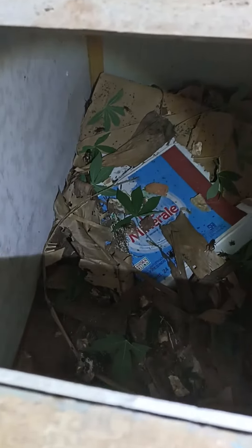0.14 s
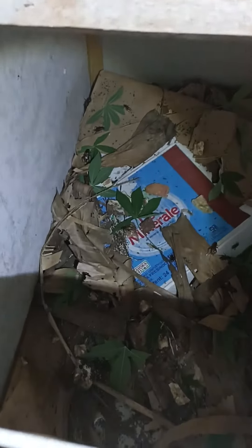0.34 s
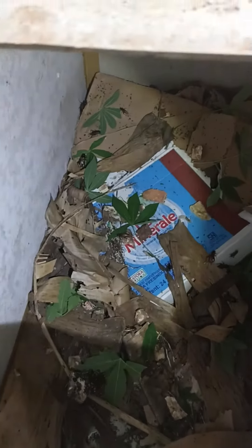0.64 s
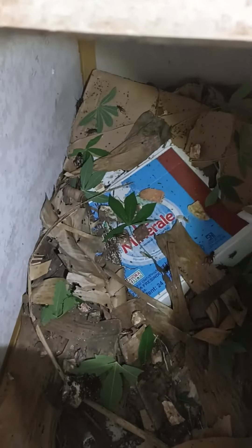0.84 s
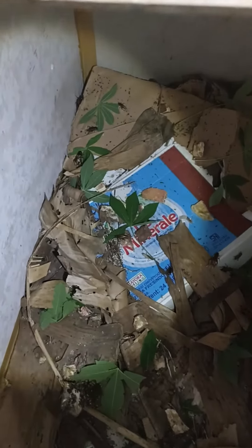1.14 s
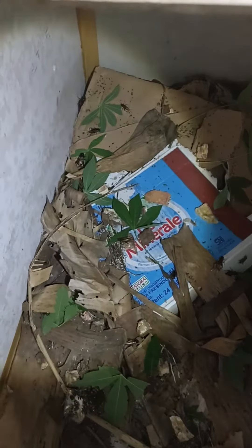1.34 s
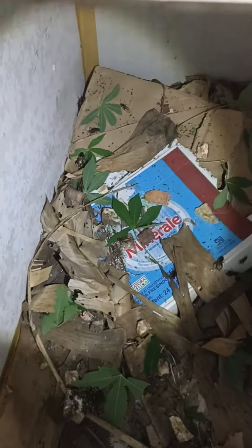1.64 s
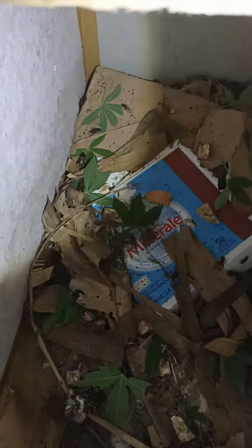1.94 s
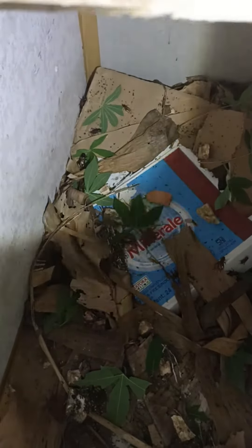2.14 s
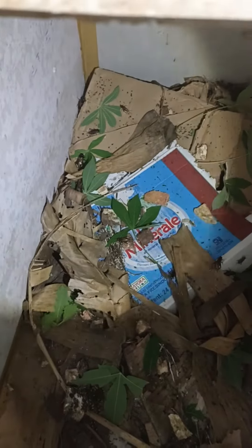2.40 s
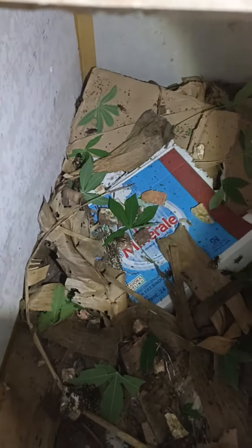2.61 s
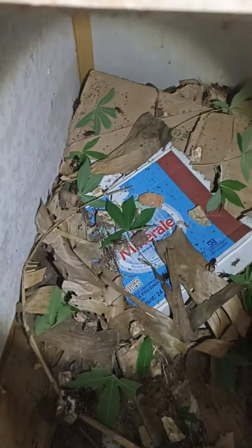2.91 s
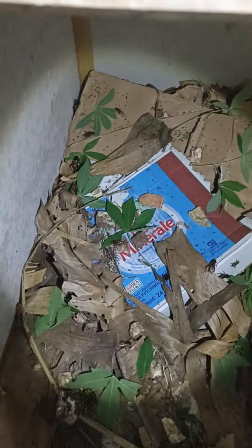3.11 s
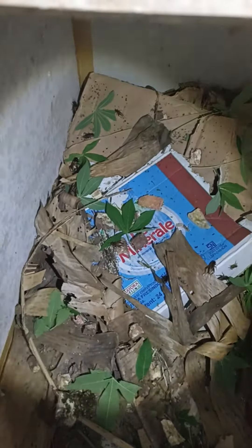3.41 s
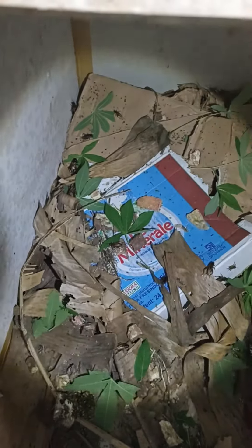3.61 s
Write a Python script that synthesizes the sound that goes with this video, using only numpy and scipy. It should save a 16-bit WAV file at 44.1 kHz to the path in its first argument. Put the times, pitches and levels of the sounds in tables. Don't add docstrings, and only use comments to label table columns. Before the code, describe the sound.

A close cricket sings quick, regular shrill chirps that strengthen, with thin ticking and raspy scrapes

```python
import sys
import numpy as np
from scipy import signal
from scipy.fft import rfft, irfft, next_fast_len
from scipy.io import wavfile
from scipy.ndimage import uniform_filter1d, map_coordinates

SR = 44100
rng = np.random.default_rng(int(sys.argv[2]) if len(sys.argv) > 2 else 0)


def store_pcm(level_fs):
    pcm = np.round(np.clip(level_fs, -1, 1) * 32767).astype(np.int16)
    wavfile.write(sys.argv[1], SR, np.atleast_2d(pcm).T)


def nominal_scale(level):
    x = np.asarray(level, float) / 20
    return 10 ** x


N = 165375

# frequency in Hz, density in dB per Hz.
HUM = [(18, -42), (30, -2), (178, 0.5), (322, -8.5), (702, -13), (810, -16), (1410, -18.5), (1880, -21),
       (4000, -23.5), (5200, -33), (8800, -120)]
# frequency in Hz, likeness from 0 to 1.
ALIKE = [(60, 1), (150, 0.76), (300, 0.42), (600, 0.4), (1200, 0)]
# frequency in Hz, density in dB per Hz.
HISS = [(3500, -37), (4500, 3), (6000, 14), (7000, 9), (9000, -5.5), (12000, 8), (15900, 0)]
# centre in seconds, length in seconds, level in dB.
RUSTLES = [
    (0.25, 0.18, -60.5),
    (0.796, 0.081, -63.5),
    (.95, 0.34, -64),
]
# frequency in Hz, density in dB per Hz.
RUSTLE_COLOUR = [(800, -5.5), (2500, 0), (4000, -12)]
# time in seconds, sixth order in Hz, level in dB.
ENGINE = [
    (0.8, 201.3, -72.5),
    (2.401, 194, -59.5),
    (2.52, 193.3, -56),
    (3.7, 190.2, -55),
]
# order (multiple of shaft speed), level in dB.
ENGINE_ORDERS = [(3.5, -6.5), (5, -2), (6, 0), (7, -58)]
# centre in seconds, length in seconds, frequency in Hz, level in dB.
FAR_TONES = [
    (1.75, .45, 670, -68),
    (3.25, .16, 1250, -70),
    (3.36, .12, 1280, -64.5),
    (3.35, .1, 1150, -68),
    (3.33, .1, 1430, -72),
    (3.12, .08, 1510, -70),
    (3.5, .12, 1050, -72),
]
# start in seconds, level in dB.
TICKS = [(0.0328, -24.5), (0.215, -29), (0.4, -21), (0.5815, -22.5), (0.7622, -23.5), (0.9368, -27),
         (1.119, -22), (1.2884, -19), (1.462, -31), (1.6333, -17.5), (1.807, -22.5), (1.983, -20),
         (2.159, -19), (2.3356, -19), (2.506, -21), (2.681, -29), (2.8526, -19.5), (3.0187, -18),
         (3.1996, -19.5), (3.3857, -21.5), (3.56, -20), (3.739, -20.5)]
# frequency in Hz, gain in dB.
TICK_SPRAY = [(4500, -14), (6000, -7), (11000, -20.5), (14000, 11), (16200, -8)]
# time in seconds, peak in dB.
FAR_STROKES = [(0.07, -54), (0.255, -54.5), (0.548, -55), (0.803, -52.5), (0.971, -51.5), (1.162, -50),
               (1.324, -49.5), (1.499, -50), (1.5897, -53), (2.0216, -52), (2.7245, -46.5), (2.8926, -51.5)]
# time in seconds, level in dB.
RASP_EARLY = [(0.1137, -56), (0.1463, -52), (0.2529, -54), (0.2883, -53.5), (0.4276, -49.5), (0.5601, -53),
              (0.5945, -42.5), (0.6921, -57), (0.7196, -52), (0.79, -56), (0.8478, -51), (0.8592, -53),
              (0.9069, -51), (0.965, -54), (1.0209, -48.5), (1.0437, -46.5), (1.0721, -49), (1.2046, -40.5),
              (1.2312, -46.5), (1.403, -63), (1.433, -55), (1.461, -42.5), (1.6075, -50), (1.628, -54),
              (1.6522, -43.5), (1.8417, -41.5), (1.8612, -47), (1.8898, -41)]
# time in seconds, level in dB.
RASP_LATE = [(1.923, -47), (2.1236, -47), (2.151, -39.5), (2.1715, -46), (2.3361, -41.5), (2.3639, -41),
             (2.3859, -44), (2.5353, -50), (2.5622, -39.5), (2.5804, -46), (2.7422, -43), (2.7688, -43.5),
             (2.792, -49), (2.9817, -44), (3.0182, -40), (3.1484, -55), (3.1658, -41.5), (3.2256, -38),
             (3.2585, -44), (3.3498, -43), (3.3766, -50), (3.4013, -43), (3.4741, -56), (3.5091, -44),
             (3.5368, -43), (3.5695, -39), (3.5898, -43), (3.7284, -44.5)]
# frequency in Hz, gain in dB.
RASP_HIGH = [
    [(6200, -3), (7500, -7.5), (8000, -5.5), (8600, -7.5), (10700, -15), (12200, -0.5), (15000, 0.5),
     (16200, -13)],
    [(6200, -3), (7500, -4), (8000, 7), (8500, -12), (9600, -3.5), (10800, -29), (12200, -18), (16000, -18)],
]
# frequency in Hz, gain in dB.
RASP_LOW = [(4300, -12.5), (5200, -1.5), (6600, -11)]
# left, then right, in dB.
RASP_WET_DB = [-1, -2]
# time in seconds, level in dB, pitch in Hz, turn to the left in dB.
SONG = [(0.4303, -45.5, 5920, 4.5), (0.5954, -29, 5814, -1), (0.8974, -43.5, 5990, 1),
        (1.0442, -28.5, 5894, 3.5), (1.0657, -38, 5940, -2), (1.209, -46.4, 6080, -1),
        (1.2304, -30.5, 5900, 4.5), (1.444, -25.5, 5960, 2.5), (1.4701, -23.5, 5865, 3),
        (1.63, -29.5, 5920, 4.5), (1.6564, -22.5, 5920, 0.7), (1.8393, -45, 5820, 5),
        (1.8672, -29, 5790, 4), (1.8948, -21, 5900, 5.5), (1.9209, -22.5, 5840, 3.3),
        (2.154, -30.5, 5830, 3), (2.179, -25, 5863, 2), (2.3635, -26, 5910, 4), (2.3913, -19, 5906, 3.2),
        (2.56, -29, 5920, 0.5), (2.5865, -20, 5880, -1), (2.7432, -41, 5880, 5), (2.7669, -24.5, 5860.0, 1),
        (2.7934, -19, 5864, 0.5), (2.9836, -40.5, 5750, 1), (3.0047, -25, 5870.0, 0.5),
        (3.0315, -21, 5910, 1.3), (3.1643, -31, 5820, 3.5), (3.214, -40.8, 5980.0, 8),
        (3.2374, -29, 5924, 4), (3.2556, -29, 6010, 3), (3.3503, -33.5, 5810, -2.5),
        (3.374, -20.5, 5846, -1), (3.403, -17, 5867, 0.5), (3.5075, -29, 6090.0, 8), (3.5368, -27, 6040, 6),
        (3.57, -23, 5850, -1.5), (3.5986, -14, 5890, -2), (3.6262, -12, 5956, -0.5),
        (3.7277, -22.5, 5960, 2.5)]
# time in seconds, stroke length factor.
STROKE_DRIFT = [
    (2.4, 1),
    (3.1, .9),
    (3.6, .72),
]
# left, then right, in dB.
SONG_WET_DB = [-2, -6]
# time in seconds, peak in dB, pitch in Hz.
LITTER = [
    (2.454, -43, 3050),
    (2.4792, -38.5, 2930),
    (2.4989, -28, 3080),
    (2.504, -30.5, 3174),
    (2.514, -36, 2690),
]

BOX_T60, SHED_T60, SHED_DB = 0.077, 0.39, -23


def unit(x):
    return x / np.sqrt(np.mean(x ** 2) + 1e-20)


def along(points, hz):
    f, v = np.transpose(points)
    return np.interp(np.log(hz + 1), np.log(f + 1), v)


def filtered(x, response):
    m = next_fast_len(x.shape[-1] + 4096)
    spectrum = rfft(x, m) * response(np.fft.rfftfreq(m, 1 / SR))
    return irfft(spectrum, m)[..., :x.shape[-1]]


def closed(points):
    return lambda hz: nominal_scale(along(points, hz)) * (hz > points[0][0]) * (hz < points[-1][0])


def wobble(rate):
    knots = rng.standard_normal(int(N * rate / SR) + 4)
    return map_coordinates(knots, [np.arange(N) * rate / SR])


def patchy(depth_db):
    z = signal.stft(rng.standard_normal((2, N)), nperseg=256)[2]
    field = uniform_filter1d(rng.standard_normal(z.shape[1:]), size=6, axis=0)
    field = uniform_filter1d(field, size=10, axis=1)
    return signal.istft(z * nominal_scale(depth_db * unit(field)), nperseg=256)[1][:, :N]


def grain(shape, size):
    noise = rng.standard_normal(shape)
    return unit(signal.fftconvolve(noise, np.hanning(size)[None], "same", axes=1))


def boxed(times, sounds, wet_db, t60):
    t = np.arange(SR // 4) / SR
    fade = nominal_scale(-60 * t / t60) + nominal_scale(SHED_DB - 60 * t / SHED_T60)
    fade = fade * (1 - np.exp(-t / 0.0024))
    tails = rng.standard_normal((len(times), 2, len(t))) * fade / np.linalg.norm(fade)
    tails = tails * nominal_scale(wet_db)[:, None]
    tails[..., 0] += 1
    wet = signal.fftconvolve(sounds, tails, axes=2)
    out = np.zeros((2, N + SR))
    for s, w in zip(times, wet):
        start = round(s * SR)
        out[:, start:start + w.shape[1]] += w
    return out[:, :N]


def glide(count, top_hz, end_hz, length, rise, fall, scatter):
    t = np.arange(SR // 40) / SR
    hz = end_hz + (top_hz - end_hz) * np.clip(1 - t / length, 0, 1) ** 1.46
    hz = hz * (1 + scatter * rng.standard_normal((count, 1)))
    shape = np.sin(np.pi / 2 * np.clip(t / rise, 0, 1)) * np.clip((length - t) / fall, 0, 1)
    return 2 * np.pi * np.cumsum(hz, 1) / SR, shape


def shed():
    t = np.arange(N) / SR
    turn = lambda hz: np.arccos(np.clip(along(ALIKE, hz), -1, 1)) / 2
    spread = lambda hz: closed(HUM)(hz) * [np.cos(turn(hz)), np.sin(turn(hz))]
    mid, side = filtered(patchy(depth_db=1.48), spread)
    hum = unit(np.array([mid + side, mid - side])) * nominal_scale([[-.6], [.6]])
    hum_db = -52 - 1.33 * (t / t[-1] - 0.53)
    tilt = lambda hz: nominal_scale([0 * hz, -7 * np.log2((hz + 1) / 6000)])
    hiss = unit(filtered(patchy(depth_db=2.2), lambda hz: closed(HISS)(hz) * tilt(hz)))
    flutter_db = 2.2 * wobble(70) + 1.8 * wobble(28)
    hiss_db = -63 - 2 * t / t[-1] + flutter_db
    swells = sum(nominal_scale(db) * np.exp(-(2 * (t - s) / length) ** 2) for s, length, db in RUSTLES)
    rustle = swells * nominal_scale(2 * wobble(41.2)) * unit(filtered(patchy(depth_db=1.0), closed(RUSTLE_COLOUR)))
    return nominal_scale(hum_db) * hum + nominal_scale(hiss_db) * hiss + rustle


def engine():
    t = np.arange(N) / SR
    s, hz, db = np.transpose(ENGINE)
    turn = 2 * np.pi * np.cumsum(np.interp(t, s, hz) / 6) / SR
    drone = sum(nominal_scale(level + 1.07 * wobble(9)) * np.sin(k * turn + 0.32 * wobble(10))
                for k, level in ENGINE_ORDERS)
    far = np.zeros(N)
    for centre, length, f, level in FAR_TONES:
        swell = nominal_scale(level + 3 * wobble(14)) * np.exp(-(2 * (t - centre) / length) ** 4)
        far += swell * np.sin(2 * np.pi * f * t + .7 * wobble(25))
    return nominal_scale(np.interp(t, s, db) + 3.5) * drone * nominal_scale([[-.7], [.7]]) + far


def ticks():
    s, db = np.transpose(TICKS)
    phase, shape = glide(len(s), top_hz=16000, end_hz=14750, length=.007, rise=.0042, fall=.0016, scatter=.008)
    spray = filtered(shape * rng.standard_normal(phase.shape), closed(TICK_SPRAY))
    rough = 1 + .35 * grain(phase.shape, size=40)
    chirp = rough * shape ** 2 * np.sin(phase)
    pair = chirp[:, None] * nominal_scale([[4.5], [-50]]) + spray[:, None] * nominal_scale([[-6], [-17.5]])
    return boxed(s, nominal_scale(db - 5.5)[:, None, None] * pair, wet_db=[-4, 7], t60=.075)


def far_cricket():
    s, db = np.transpose(FAR_STROKES)
    phase, shape = glide(len(s), top_hz=5450, end_hz=5100, length=.013, rise=.0022, fall=.0017, scatter=.02)
    stroke = nominal_scale(db)[:, None] * shape * np.sin(phase + 1.9 * grain(phase.shape, size=70))
    return boxed(s - .003, stroke[:, None] * nominal_scale([[-6], [-2]]), [1.5, 1.5], BOX_T60)


def rasps():
    s, db = np.transpose(list(RASP_EARLY) + list(RASP_LATE))
    length, teeth_per_s, patch_hz = 0.019, 4000, 900
    t = np.arange(SR // 25) / SR
    draw = rng.random((len(s), len(t)))
    teeth = (draw < teeth_per_s / SR) * rng.standard_normal(draw.shape) * np.sqrt(SR / teeth_per_s)
    teeth = teeth * np.sin(np.pi * np.clip(t / length, 0, 1)) ** .5
    high = np.stack([filtered(teeth, closed(side)) for side in RASP_HIGH], 1)
    low_gain = nominal_scale(-1 + 2.7 * rng.standard_normal((len(s), 1, 1)))
    low = low_gain * filtered(teeth, closed(RASP_LOW))[:, None] * nominal_scale([[-1], [2]])
    hz = np.fft.rfftfreq(len(t), 1 / SR)
    ripple = 0
    for k in (1, 2):
        depth = rng.standard_normal((len(s), 1, 1))
        offset = 2 * np.pi * rng.random((len(s), 2, 1))
        ripple = ripple + depth * np.cos(hz / (k * patch_hz) * np.pi + offset)
    pair = irfft(rfft(high + low) * nominal_scale(1.8 * ripple), len(t))
    return boxed(s - .002, nominal_scale(db + 2.5)[:, None, None] * pair, RASP_WET_DB, BOX_T60)


def song():
    s, db, hz, left_db = np.transpose(SONG)
    scale = np.interp(s, *np.transpose(STROKE_DRIFT))[:, None]
    top_hz, end_hz = hz[:, None] + 241, hz[:, None] - 85
    phase, shape = glide(len(s), top_hz, end_hz, length=.0153 * scale, rise=.006, fall=.0018, scatter=0)
    turn = nominal_scale(np.outer(left_db, [1, 0]))[..., None]
    rough = np.clip(.14 + .055 * (-25 - db), .14, .9)[:, None]
    phase = phase + rough * grain(phase.shape, size=130)
    dip = .0112 * scale * (1 + .04 * rng.standard_normal((len(s), 1)))
    t = np.arange(shape.shape[1]) / SR
    shape = shape * (1 - .75 * np.exp(-((t - dip) / .001) ** 2))
    shape = nominal_scale(db)[:, None] * shape * (1 + rough * grain(phase.shape, size=110))
    tone = (shape * np.sin(phase))[:, None] * nominal_scale([[-8], [1]]) * turn
    octave = shape * (1 + .3 * grain(phase.shape, size=60)) * np.sin(2 * phase)
    octave = octave[:, None] * nominal_scale([[-10.5], [-28]]) * turn
    scrape = shape * rng.standard_normal(shape.shape)
    scrape = np.stack([filtered(scrape, closed(side)) for side in RASP_HIGH], 1)
    octave = octave + nominal_scale(-25.5) * scrape
    s = s - .003
    left, right = boxed(s, tone, SONG_WET_DB, BOX_T60) + boxed(s, octave, [-1.5, -1.5], t60=.059)
    lag = round(.00093 * SR)
    return np.array([left, np.pad(right, (lag, 0))[:N]])


def litter():
    s, db, hz = np.transpose(LITTER)
    t = np.arange(SR // 40) / SR
    angle = 2 * np.pi * hz[:, None] * t
    ring = np.sin(angle) * nominal_scale(-60 * t / 0.019)
    click = 1.36 * np.sin(0.78 * angle) * nominal_scale(-60 * t / 0.0059)
    snap = nominal_scale(db)[:, None] * (ring + click) * (1 - np.exp(-t / 0.00069))
    return boxed(s - .001, snap[:, None] * nominal_scale([[-2.5], [1.5]]), wet_db=[-9, -8], t60=.05)


def scene():
    return shed() + engine() + ticks() + far_cricket() + rasps() + song() + litter()


def roll_off(x):
    return signal.sosfilt(signal.butter(12, 16990, fs=SR, output="sos"), x)


def record(dry):
    shelf = lambda hz: nominal_scale(-18 / (1 + np.exp((16100 - hz) / 120)))
    band = lambda hz: shelf(hz) / np.sqrt(1 + (71.8 / (hz + 1)) ** 10)
    return roll_off(filtered(dry, band))


dry = scene()
out = record(dry)
store_pcm(out)
```